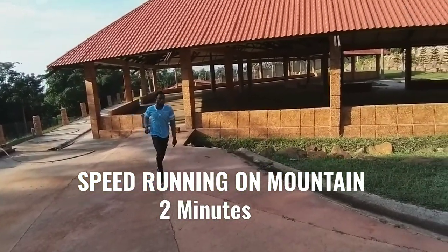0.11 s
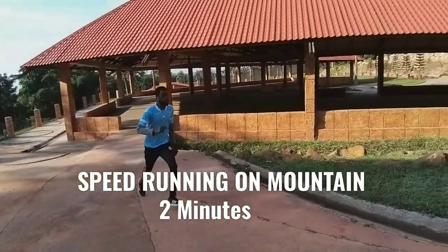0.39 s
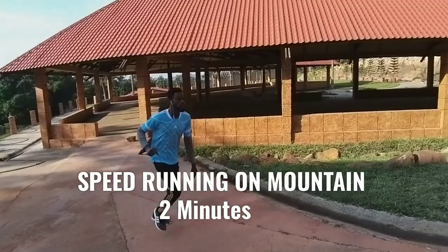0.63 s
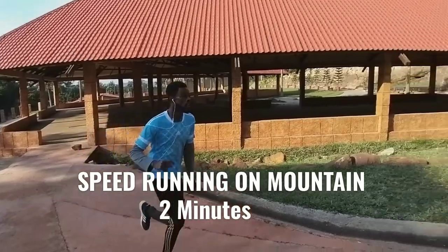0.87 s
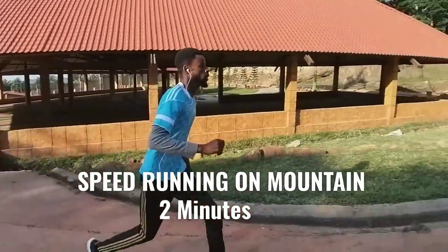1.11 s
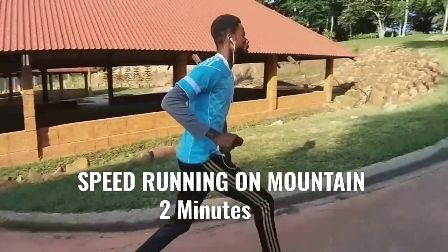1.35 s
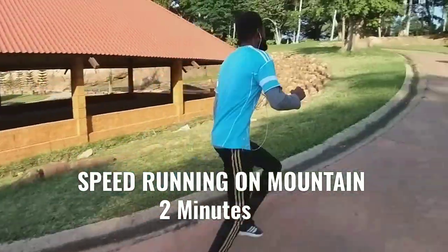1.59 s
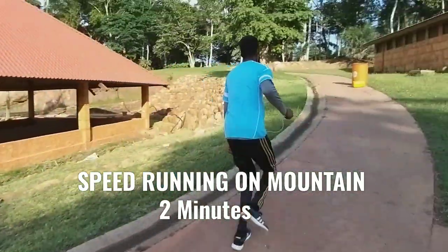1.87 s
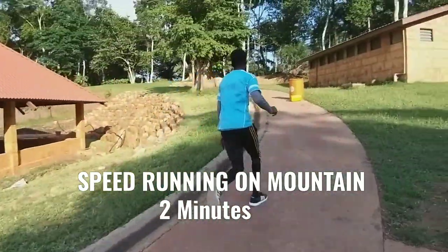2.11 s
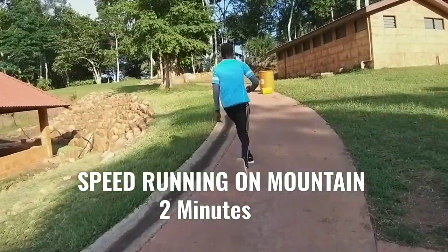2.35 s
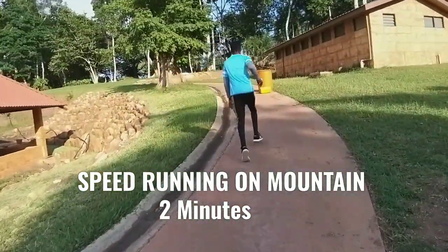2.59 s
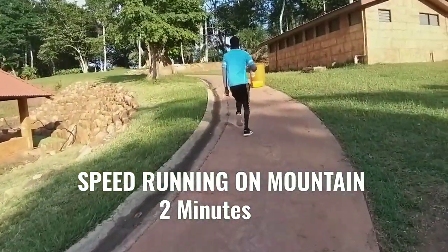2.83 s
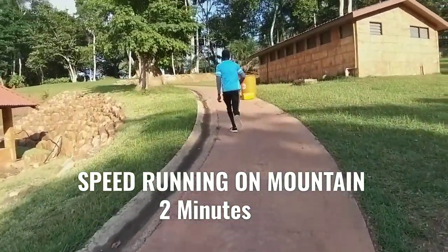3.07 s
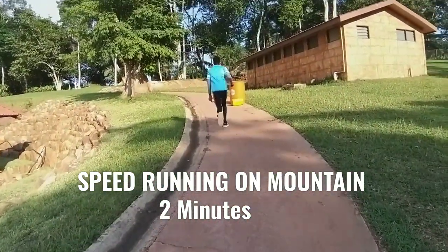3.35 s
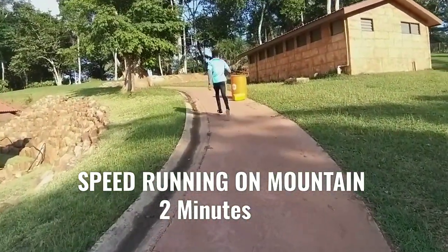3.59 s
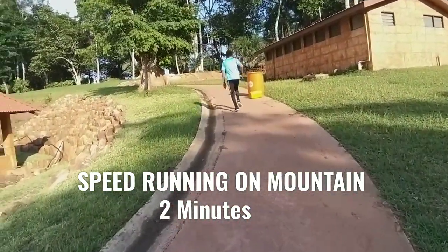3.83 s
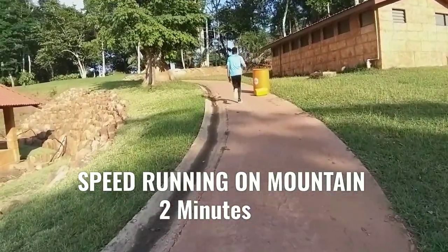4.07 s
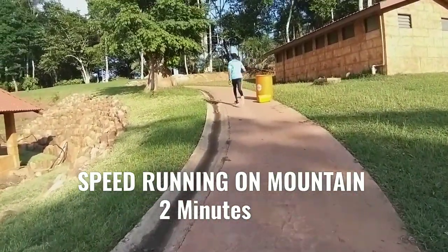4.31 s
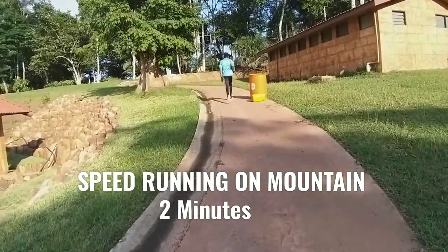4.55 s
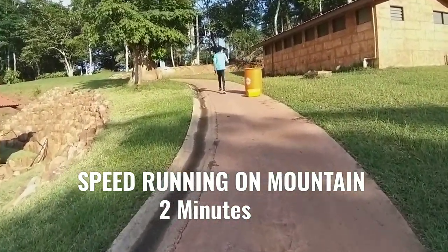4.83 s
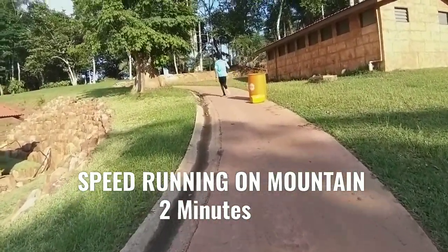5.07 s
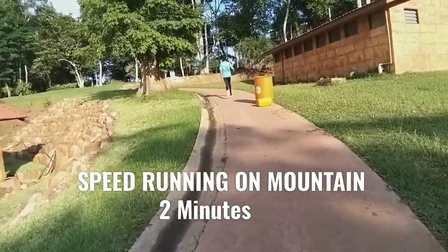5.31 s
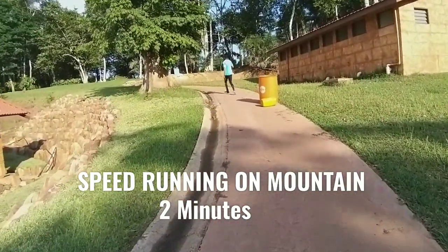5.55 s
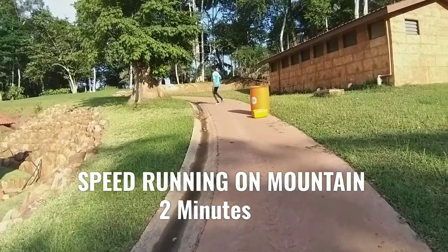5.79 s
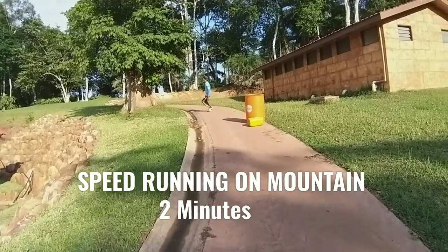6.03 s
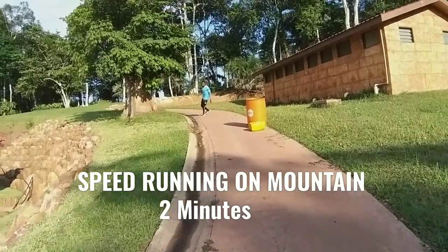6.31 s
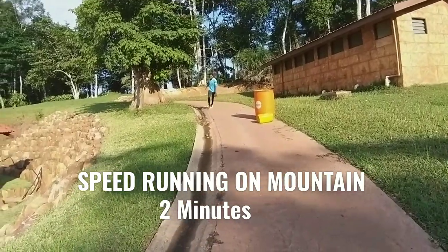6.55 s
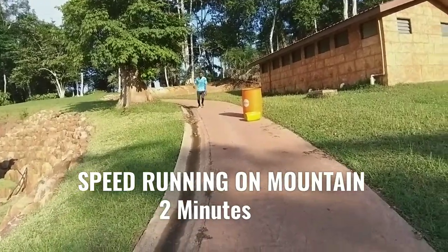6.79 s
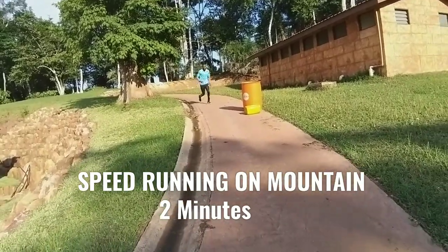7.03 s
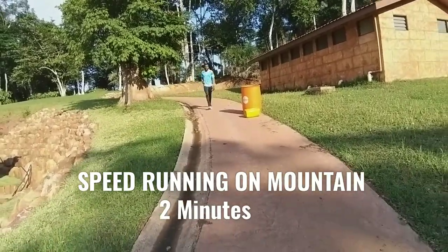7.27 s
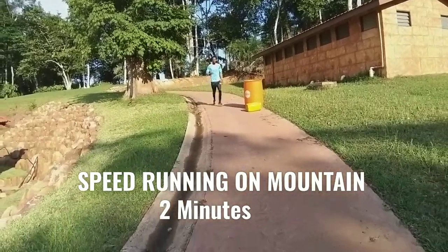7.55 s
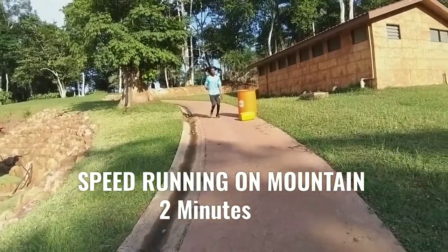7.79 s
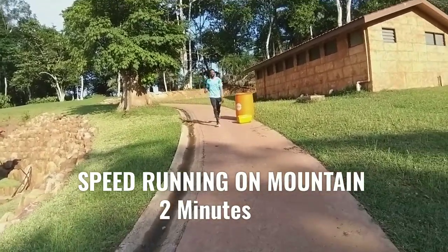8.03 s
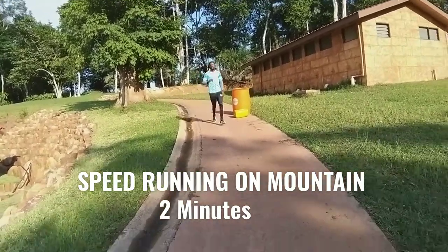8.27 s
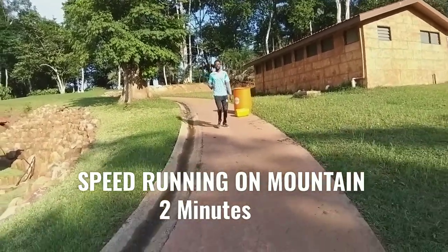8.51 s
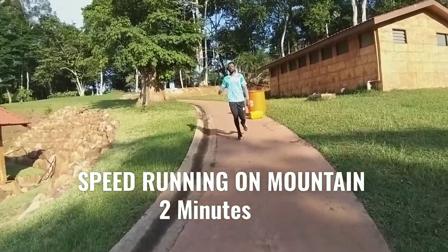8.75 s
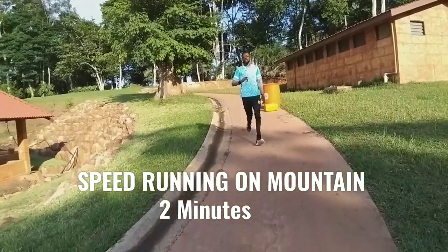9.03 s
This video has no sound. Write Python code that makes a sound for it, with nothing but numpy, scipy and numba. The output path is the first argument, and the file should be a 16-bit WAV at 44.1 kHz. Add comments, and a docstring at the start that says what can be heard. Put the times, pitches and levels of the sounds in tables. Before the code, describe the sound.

Outdoors on a paved path, crisp irregular shoe scuffs and slaps run throughout, grains snapping under the soles. Low fluttering gusts push into the phone's stereo microphones, mainly the left, in the first six seconds. Behind are a thin high insect shimmer, soft distant air, a weak low motor hum and five faint short bird whistles midway. The last three seconds are calmer, with steps still close and gritty.

```python
"""Trainers slap and scuff on a gritty paved path close to a hand-held phone; grit cracks under the soles.
Gusts buffet the two microphone ports, mostly the left; insects sing in the trees, a bird calls, a far motor hums.
Soles are coloured stick-slip noise, cracks are ringing snaps, and heels are damped sines.
Wind is moving band-passed noise with bursts for single eddies; insects and air are narrow and wide noise bands.
The bird is a set of arched whistles, the motor a wavering sine."""
import sys
import numpy as np
from scipy import signal
from scipy.fft import rfft, irfft, next_fast_len
from scipy.io import wavfile
from scipy.ndimage import uniform_filter1d
from numba import njit

SR = 44100
rng = np.random.default_rng(int(sys.argv[2]) if len(sys.argv) > 2 else 0)


def put_to_file(sound):
    """Save the sound as 16-bit audio at rate SR, in the file named by the first command-line argument."""
    columns = np.atleast_2d(sound).T  # one column per channel
    safe = np.clip(columns, -1, 1)
    whole_steps = np.round(safe * 32767)
    wavfile.write(sys.argv[1], SR, whole_steps.astype(np.int16))


def invert_db(level):
    """Linear amplitude ratio for a level in decibels (20 dB per decade), elementwise."""
    return 10 ** (np.asarray(level, dtype=float) / 20)


N = 402633  # length in samples


@njit
def svf(x, hz, width):
    """State-variable band-pass with a moving centre, gain 1 at the centre."""
    y, band_state, low_state = np.empty(len(x)), 0., 0.
    for i in range(len(x)):
        g = np.tan(np.pi * hz[i] / SR)
        damping = width[i] / hz[i]
        v = (band_state + g * (x[i] - low_state)) / (1 + g * (g + damping))
        band_state = 2 * v - band_state
        low_state += 2 * g * v
        y[i] = damping * v
    return y


def band(x, hz, width):
    """Fixed or moving band-pass; centre and width in Hz."""
    return svf(x, hz + np.zeros(len(x)), width + np.zeros(len(x)))


def unit(x):
    """Scale to rms 1."""
    return x / np.sqrt(np.mean(x ** 2))


def walk(rate):
    """Random levels held 1 / rate s and slewed twice; spread near 1."""
    k = int(SR / rate)
    steps = np.repeat(rng.standard_normal(N // k + 1), k)
    return 1.613 * uniform_filter1d(uniform_filter1d(steps, k), k)[:N]


def columns(table):
    """Curve columns at every sample; the first column is the time in s."""
    s, *rest = np.transpose(table)
    return [np.interp(np.arange(N) / SR, s, c) for c in rest]


def add(out, s, sound, pan_db, lag_per_db=0.):
    """Mix a short sound (one row per port) in at s; pan_db is left minus right."""
    # the left port hears it 2.5 samples later, plus lag_per_db samples per dB that it is quieter
    left_lag = 2.5 - pan_db * lag_per_db
    for port, side in enumerate((1, -1)):
        i = int(s * SR + side * left_lag / 2)
        skip = max(-i, 0)
        n = min(sound.shape[1], N - i)
        out[port, i + skip:i + n] += invert_db(side * pan_db / 2) * sound[port, skip:n]


# Colour of the distant air. Each row: frequency in Hz, relative level in dB per Hz.
AIR_COLOUR = [(30, 9), (60, 6), (127, -3), (200, -8.5), (400, -14.5), (1200, -25), (2800, -24), (6000, -19),
              (9500, -33), (13700, -23), (16000, -50)]


def air():
    """Distant town and leaves: half-octave bands that flicker alone; the bass is more alike left and right."""
    out, swell = 0, walk(0.38)
    f, level = np.transpose(AIR_COLOUR)
    for hz in 45 * 2 ** np.arange(0, 8.5, 1 / 2):
        mid, side = (band(band(rng.standard_normal(N), hz, hz / 2), hz, hz / 2) for _ in range(2))
        db = np.interp(np.log(hz), np.log(f), level) + swell + walk(9.4)
        side_share = np.clip(0.27 + hz / 1500, 0, 1)
        out = out + invert_db(db) * (mid + side_share * side * np.array([[1], [-1]]))
    return invert_db(-61) * unit(out)  # rms in dB


def hum():
    """A far motor: one sine whose pitch and level waver."""
    hz = 135.4 + 1.096 * walk(7.2)
    level_db = -66 + 0.89 * walk(10)
    return invert_db(level_db) * np.sin(2 * np.pi * np.cumsum(hz) / SR)


# Insect choruses. Each row: centre in Hz, width of each band-pass in Hz, level in dB around which it throbs.
CHORUSES = [(8290, 600, -65), (6210, 1300, -71.5), (2850, 90, -89)]


def insects():
    """Choruses of many clicking insects, each a narrow band that throbs, swells and drifts."""
    out = 0
    for hz, width, db in CHORUSES:
        throb_db = 2.5 * walk(70) + walk(9) + .4 * walk(1.2)
        centre = hz * (1 + 0.002 * walk(3))
        noise = [rng.standard_normal(N) for _ in range(2)]
        chorus = np.array([unit(band(band(x, centre, width), centre, width)) for x in noise])
        out = out + invert_db(db + throb_db) * chorus
    return out


# Whistles of a bird. Each row: start in seconds, length in seconds, top pitch in Hz,
# level in dB before the unsteadiness and the echoes.
BIRD_CALLS = [(4.645, .12, 2030, -67), (4.952, .08, 1950, -65), (5.25, .09, 1915, -65),
              (5.55, .08, 1870, -67), (5.95, .14, 1980, -71)]


def bird():
    """Slightly unsteady whistles that rise and fall in an arch, blurred by echoes from the buildings."""
    out = np.zeros((2, N))
    for s, length, top_hz, db in BIRD_CALLS:
        u = np.linspace(0, 1, int(length * SR))
        hz = top_hz * (1 - .5 * (u - .5) ** 2)
        whistle = np.sqrt(np.sin(np.pi * u)) * np.sin(2 * np.pi * np.cumsum(hz) / SR)
        add(out, s, invert_db(db) * np.tile(whistle, (2, 1)), -1.0)
    out = out * invert_db(4.1 * np.array([walk(99), walk(120)]))
    near_echo = invert_db(-8) * np.roll(out, int(.028 * SR), axis=1)
    far_echo = invert_db(-10) * np.roll(out, int(.07 * SR), axis=1)
    return out + near_echo + far_echo


# Wind on the ports. Each row: time in seconds, relative level in dB, left minus right in dB.
GUSTS = [(0.8, -58.5, -15), (0.99, -58, -27), (1.06, -36, -32), (1.23, -47.5, -2), (1.42, -50, -2),
         (1.51, -42, -4), (1.71, -44, -4), (1.79, -32.5, 10), (2.02, -32, 13), (2.1, -33, 17),
         (2.17, -28.5, 17), (2.26, -39.5, 9), (2.54, -33.5, 15.5), (2.84, -44.5, 10), (3.01, -52, 6),
         (3.12, -47.5, 3), (3.6, -41.5, 0), (3.69, -28.5, 14), (3.9, -32, 10), (4.03, -24, 20),
         (4.09, -36, 8), (4.22, -35, 17), (4.52, -39.5, 9), (4.91, -49, 3), (5.06, -52, 3), (5.17, -35, -6),
         (5.33, -39, 1.5), (5.48, -47.5, -2), (5.92, -52.5, 2.5), (6.0, -56, 5), (6.6, -68.5, -5)]


def gusts():
    """Turbulence unrelated at the two ports: lumpy, and brighter the harder it blows."""
    out = np.zeros((2, N))
    level_db, pan_db = columns(GUSTS)
    t = np.arange(N) / SR
    outside_s = np.maximum(t - GUSTS[-1][0], GUSTS[0][0] - t)
    level_db = level_db - 40 * np.clip(outside_s, 0, 1)  # calm before the first row and after the last
    for port, side in enumerate((1, -1)):
        db = level_db + 7 - 10 * np.log10(1 + invert_db(-2 * side * pan_db))  # the ports share the power
        lumps_db = 3.44 * walk(40)
        hz = 150 * invert_db(0.29 * (db + 33.5 + lumps_db))
        # big slow eddies carry most of the pressure; the smallest cancel over the port
        gust = signal.lfilter([1], np.convolve([1, -.997], [1, -.997]), rng.standard_normal(N))
        for _ in range(3):
            gust = band(gust, hz, 2.11 * hz)
        out[port] = invert_db(db - 4.5 + lumps_db) * unit(gust * hz ** 1.02)
    return out


# Single eddies slapping a port. Each row: time in seconds, relative peak in dB, pitch in Hz,
# port (1 left, -1 right).
EDDIES = [(0.892, -41.5, 80.7, -1), (1.042, -35, 82, -1), (1.488, -29, 102, -1), (1.738, -29, 117, 1),
          (1.778, -20.5, 124, 1), (1.857, -24, 127, 1), (1.966, -24, 90, 1), (2.013, -22.5, 115, 1),
          (2.053, -20, 118, 1), (2.13, -20, 159, 1), (2.162, -19, 159, 1), (2.336, -19, 158, 1),
          (2.424, -21, 117, 1), (2.46, -23.5, 138, 1), (2.516, -27.5, 156, 1), (2.549, -26, 157, 1),
          (2.646, -26.5, 154, 1), (2.789, -38, 126, 1), (2.912, -26.5, 109, 1), (3.645, -23, 202, 1),
          (3.679, -22, 126, 1), (3.727, -19.5, 132, 1), (3.801, -20, 156, 1), (3.829, -22, 172, 1),
          (3.938, -15, 167, 1), (3.97, -21, 108, 1), (4.018, -12, 204, 1), (4.029, -17, 181, 1),
          (4.07, -26.5, 92.5, 1), (4.134, -22, 85, 1), (4.288, -24, 126, 1), (4.319, -27.5, 191, 1),
          (4.358, -32, 142, 1), (4.41, -29, 135, 1), (4.483, -23.5, 147, 1), (4.81, -36, 115, 1),
          (4.974, -29.5, 130, 1), (5.136, -18.5, 126, -1), (5.242, -34, 160, -1), (5.321, -32.5, 88, 1),
          (5.912, -35.5, 101, 1)]


def buffets():
    """Each eddy is a cycle or two of pressure with a sharper kick at its core."""
    out = np.zeros((2, N))
    lee_db = 42.5  # an eddy is this much weaker at the other port
    t = np.arange(-SR // 20, SR // 20) / SR
    for s, db, hz, port in EDDIES:
        phase = 6 * rng.random()
        eddy = np.exp(-(t * hz / 0.63) ** 2) * np.cos(2 * np.pi * hz * t + phase)
        kick = np.exp(-(t * hz / 0.26) ** 2) * np.cos(2 * np.pi * 1.72 * hz * t + phase)
        pressure = invert_db(db + 4 - lee_db / 2) * np.tile(eddy + 0.44 * kick, (2, 1))
        add(out, s + t[0] + 0.00623, pressure, np.sign(port) * lee_db)
    return out


# Where the feet are heard. Each row: time in seconds, left minus right in dB.
FEET_PAN = [(0.0, -0.5), (0.5, 3), (1.2, 2.5), (2.0, 1), (3.0, -1), (3.9, 0.5), (4.8, -2.5), (5.6, -0.5),
            (6.3, -4.5), (6.9, 1.5), (7.4, 0), (9.1, -0.5)]


def add_step(out, s, sound, step_s):
    """Mix a foot sound in at s, placed where the feet are at step_s; the quieter port hears it later."""
    add(out, s, sound, np.interp(step_s, *np.transpose(FEET_PAN)), lag_per_db=1.5)


# Colour of a dragging sole, before its bands are levelled. Each row: frequency in Hz, relative level in dB per Hz.
SOLE_COLOUR = [(150, -5.5), (400, -4), (650, -4), (1000, -6.5), (1350, -2.5), (1900, -3), (2700, 0.5),
               (4000, -1), (6500, 4), (12500, 8), (15000, 2.5)]
# Crossovers where body, grit, hiss and sizzle meet. Each entry: frequency in Hz.
SOLE_EDGES_HZ = [2000, 4790, 7510]


def friction():
    """Dense stick-slip grains of uneven size in four overlapping bands; part of the sound differs between the ports."""
    def grains():
        """Noise whose sample levels spread widely and flutter."""
        size_db = np.minimum(3 * rng.exponential(size=N), 26)
        return rng.standard_normal(N) * invert_db(size_db + 0.55 * walk(250))
    shared, size = grains(), next_fast_len(N)
    log_f = np.log(np.fft.rfftfreq(size, 1 / SR) + 1)
    f, db = np.transpose(SOLE_COLOUR)
    spectrum = rfft([shared + grains() for _ in range(2)], size) * invert_db(np.interp(log_f, np.log(f), db))
    above = [1, *(.5 + .5 * np.tanh((log_f - np.log(hz)) / 0.1) for hz in SOLE_EDGES_HZ), 0]
    bands = []
    for lower, upper in zip(above, above[1:]):
        sound = irfft(spectrum * (lower - upper), size)[:, :N]
        bands.append(unit(sound * invert_db(2.5 * walk(150))))  # each band is patchy by itself
    return np.array(bands)


# Rustle of feet and clothes between the scuffs. Each row: time in seconds, grit level in dB around which
# it wavers, body in dB relative to the grit.
RUSTLE = [(0.0, -72, 7), (0.18, -73.5, 2.5), (1.04, -63.5, -1), (1.19, -59, 3), (1.6, -69, 0.5),
          (1.96, -66, -3.0), (2.84, -68, 3), (3.02, -65.5, -3.5), (3.43, -66, -3.5), (3.74, -62.5, -9.5),
          (4.12, -68.5, 4.5), (4.35, -65, -5), (5.19, -68, -3.0), (5.31, -67, -1), (5.62, -78, -1),
          (5.74, -63, 1), (6.74, -79, -4), (7.42, -66, -3.0), (7.71, -71.5, -5), (9.13, -61.5, -4.5)]


def rustle(sole):
    """Soft friction of feet and clothes that runs on at a wavering level."""
    level_db, body_db = columns(RUSTLE)
    body, grit, hiss, sizzle = sole
    sound = invert_db(body_db) * body + grit + invert_db(-6) * hiss + invert_db(-3) * sizzle
    # half a second of shift keeps it apart from the scuffs, which use the same grains
    return invert_db(level_db + 2.5 * walk(30) + .8 * walk(6)) * np.roll(sound, SR // 2, axis=1)


# Soles dragging on the paving. Each row: peak time in seconds, length in seconds, grit level in dB,
# body and sizzle in dB relative to the grit.
SCUFFS = [(0.1, 0.19, -45, -7.5, -4.5), (0.153, 0.032, -40.5, -7, 4.5), (0.468, 0.029, -53, -5, 0.5),
          (0.556, 0.12, -59.5, 2, -3.5), (0.784, 0.024, -44.5, -12, -0.5), (1.098, 0.016, -37, -11, 3),
          (1.157, 0.07, -54.5, -2.5, -24), (1.237, 0.18, -59, -2, 2), (1.318, 0.085, -60, 5.5, 14.5),
          (1.425, 0.045, -64, -2.5, 9), (1.608, 0.14, -57, -6.5, 0.5), (1.876, 0.064, -56.5, 0, -9),
          (1.925, 0.067, -52, -10, -2), (1.964, 0.032, -46.5, 0.5, -12), (2.046, 0.036, -53.5, 0, 5),
          (2.255, 0.13, -55, -17, 0.5), (2.478, 0.063, -47, 0, 2.5), (2.56, 0.14, -51.5, -8, -1.5),
          (2.678, 0.023, -49.5, -2, 6), (2.89, 0.074, -49.5, -19, -3), (3.036, 0.068, -41, -2.5, -2),
          (3.17, 0.078, -59, -31, 0), (3.246, 0.13, -63, -14, 0), (3.682, 0.061, -54, 5, 7.5),
          (3.83, 0.11, -59, -3, -4), (3.937, 0.016, -50, -6, -11), (4.383, 0.054, -47, -2.5, -2),
          (4.505, 0.17, -59, -14, -1.5), (4.798, 0.036, -52.5, -14, -12), (5.053, 0.078, -51.5, -2.5, -4),
          (5.126, 0.051, -50.5, -5, -32), (5.196, 0.06, -56, -5.5, -11), (5.616, 0.062, -47.5, -7, -3),
          (5.716, 0.076, -41, -4.5, -2.5), (5.93, 0.2, -58, -3, -12), (6.21, 0.11, -60, -7, -6),
          (6.288, 0.014, -39, -3, -7), (6.302, 0.04, -39, -1, -8), (6.649, 0.02, -52.5, -28, -10),
          (6.834, 0.043, -47.5, 0, -8.5), (6.992, 0.024, -50, -18, -3.5), (7.21, 0.13, -63.5, 3, -5),
          (7.34, 0.02, -39.5, -21, -1.5), (7.415, 0.11, -54, -4, -11), (7.51, 0.14, -50.5, -0.5, 0),
          (7.72, 0.096, -55, -8.5, -1.5), (8.008, 0.019, -37.5, -8, 2), (8.138, 0.08, -59, -8, 3),
          (8.306, 0.052, -55, -17, -6), (8.348, 0.081, -45.5, -2.5, -1), (8.748, 0.13, -56.5, -1.5, -3),
          (8.917, 0.2, -63, 6, -16), (9.033, 0.014, -52, -7, 10), (9.095, 0.11, -53, 2.5, -4)]


def scuffs(sole):
    """Slaps and drags: swells of friction, each with its own balance of body, grit, hiss and sizzle."""
    out = np.zeros((2, N))
    # a loaded sole presses its rubber to the ground, and that rings near 1 kHz
    ring = np.array([band(port, 1050., 500.) for port in sole[0]])
    loaded = np.array([unit(sole[0] + 1.8 * ring), *sole[1:]])
    for s, length, db, body_db, sizzle_db in SCUFFS:
        rise = length * min(.3 + 3.3 * length, .55)  # longer scuffs spend a larger share rising
        fall = length - rise
        t = np.arange(-int(2.5 * rise * SR), int(5.2 * fall * SR)) / SR
        edge = np.clip(0.92 + 0.014 / rise, 1, 3)  # slaps start abruptly, drags swell
        distance = np.abs(t / np.where(t < 0, rise, fall))
        shape = invert_db(db - 11.05 * distance ** np.where(t < 0, edge, 1.7))
        at = (int(s * SR) + np.arange(len(t))) % N
        hiss_db = -1 + 0.44 * sizzle_db  # the hiss follows the sizzle in part
        colour = invert_db(np.array([body_db, 0, hiss_db, sizzle_db]))
        add_step(out, s + t[0], shape * np.tensordot(colour, loaded[:, :, at], axes=1), s)
    return out


# Grit cracking under a sole. Each row: time in seconds, relative peak in dB, ring pitch in Hz.
CRACKS = [(0.1399, -27.5, 2100), (0.1495, -23.5, 9200), (0.4638, -34.5, 2500), (0.7788, -32.5, 4360),
          (1.0712, -34, 2000), (1.0938, -16.5, 6520), (1.1743, -36, 3600), (1.3246, -31, 7240),
          (1.4155, -40, 1550), (1.576, -36, 8250), (1.885, -35, 2320), (1.9591, -24, 2270),
          (1.9898, -26, 6600), (2.0425, -36, 1570), (2.1916, -36, 6500), (2.4788, -30, 6750),
          (2.677, -24, 5670), (2.8869, -34, 2210), (2.9897, -28, 2640), (3.203, -34.5, 6600),
          (3.2392, -35, 3300), (3.654, -39.5, 2860), (3.8312, -35.5, 2040), (3.9387, -32.5, 2600),
          (4.2407, -32.5, 3950), (4.357, -26.5, 2670), (4.798, -29.5, 3970), (4.8865, -37, 5440),
          (4.9153, -35.5, 8300), (5.1208, -31, 2040), (5.199, -33, 2040), (5.5881, -40, 2460),
          (5.665, -37, 1590), (5.6925, -29, 2640), (6.284, -28, 4050), (6.645, -38, 2760),
          (6.8235, -36.5, 3200), (6.9825, -47, 2860), (7.3397, -29, 5400), (7.3733, -32, 1570),
          (7.712, -26.5, 2740), (7.7546, -31.5, 2800), (8.005, -25, 2210), (8.2837, -27.5, 2560),
          (8.312, -32, 3430), (8.4304, -31.5, 2600), (8.4907, -39, 4180), (8.6891, -33, 1580),
          (8.7564, -34, 1510), (9.0309, -41, 2870)]


def cracks():
    """A grain snaps (wide noise) and rings briefly at its own, unsteady pitch."""
    out = np.zeros((2, N))
    t = np.arange(SR // 20) / SR
    fade = np.exp(-np.log(1000) * t / 0.0065) * np.minimum(t / 0.0004, 1)  # decays by 60 dB in 6.5 ms
    for s, db, hz in CRACKS:
        shared, *apart = rng.standard_normal((3, len(t)))
        snap = np.array([band(shared + 1.2 * noise, 1.35 * hz, 1.9 * hz) for noise in apart])
        ring = np.sin(2 * np.pi * hz * t + 0.26 * np.cumsum(shared))
        add_step(out, s, invert_db(db) * fade * (0.87 * snap + ring), s)
    return out


# Heel weight landing. Each row: time in seconds, relative peak in dB, pitch in Hz.
THUDS = [(0.137, -46, 148), (0.461, -39, 189), (0.514, -44.5, 318), (0.773, -41, 126), (1.41, -44, 103),
         (1.459, -34, 107), (6.286, -43.5, 98), (7.691, -49.5, 130), (7.993, -51.5, 484), (8.341, -53, 135),
         (8.686, -47, 212), (8.743, -47, 183), (9.027, -43.5, 196)]


def thuds():
    """Heel weight on the paving: a heavily damped low sine with a shorter, higher knock."""
    out = np.zeros((2, N))
    t = np.arange(SR // 8) / SR
    for s, db, hz in THUDS:
        thud = np.sin(2 * np.pi * hz * t) * np.exp(-t / 0.0042) * np.minimum(t / 0.003, 1)
        knock = np.sin(2 * np.pi * 2.36 * hz * t) * np.exp(-t / 0.0031) * invert_db(-9.5)
        # the lift makes up for what the fast damping takes
        add(out, s, invert_db(db + 10.5) * np.tile(thud + knock, (2, 1)), -2.5)
    return out


def feet():
    """Rustle and scuffs from one bed of friction, with cracking grit and heel thuds."""
    sole = friction()
    return rustle(sole) + scuffs(sole) + cracks() + thuds()


def scene():
    """All sources at the two ports."""
    return air() + hum() + insects() + bird() + gusts() + buffets() + feet()


def low_pass(x):
    """Removes everything above the highest recorded frequency."""
    return signal.sosfilt(signal.butter(12, 16480, fs=SR, output="sos"), x)


def record(dry):
    """The phone cuts the deepest bass below 36 Hz and the top above 15 kHz."""
    x = signal.sosfilt(signal.butter(2, 36, "high", fs=SR, output="sos"), dry)
    x = signal.sosfilt(signal.butter(8, 15000, fs=SR, output="sos"), x)
    return low_pass(x)


dry = scene()
out = record(dry)
put_to_file(out)
```